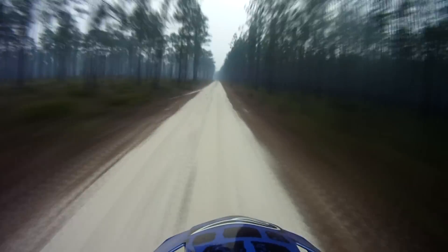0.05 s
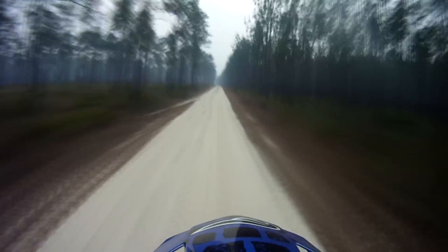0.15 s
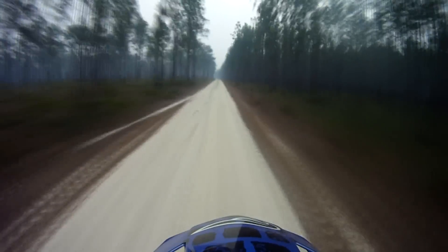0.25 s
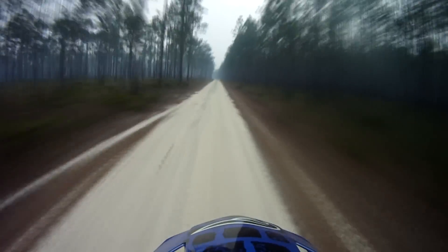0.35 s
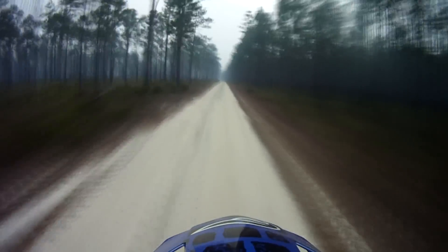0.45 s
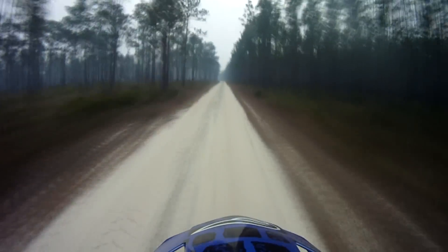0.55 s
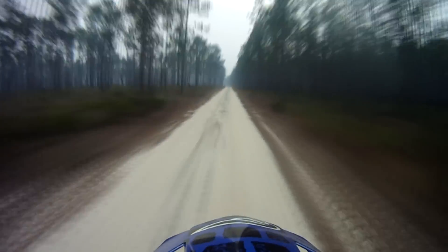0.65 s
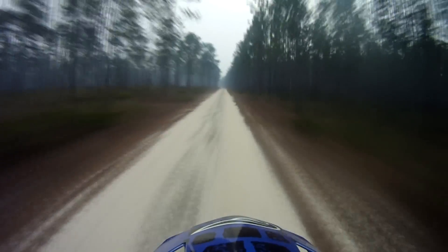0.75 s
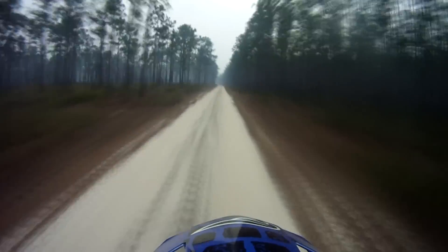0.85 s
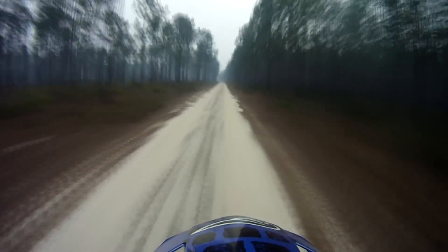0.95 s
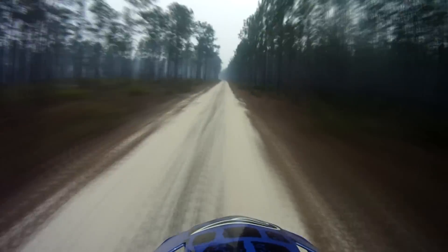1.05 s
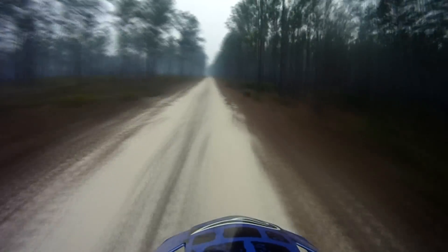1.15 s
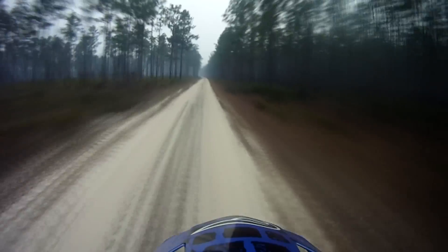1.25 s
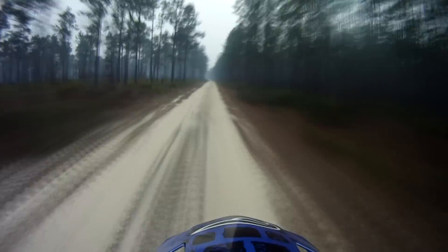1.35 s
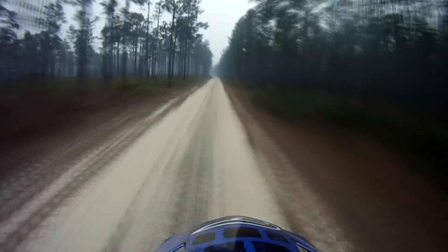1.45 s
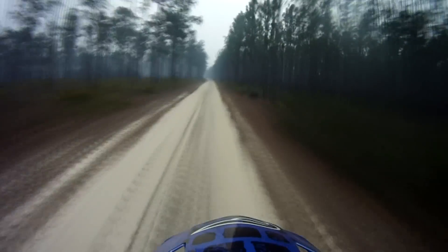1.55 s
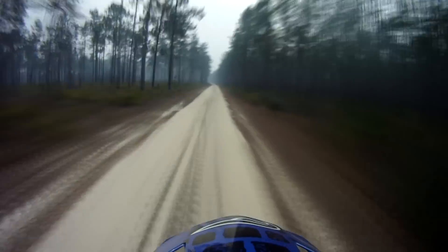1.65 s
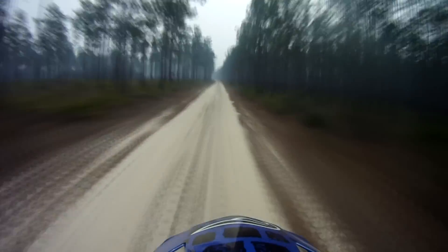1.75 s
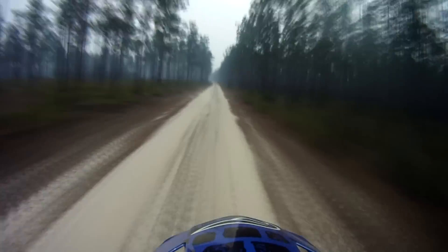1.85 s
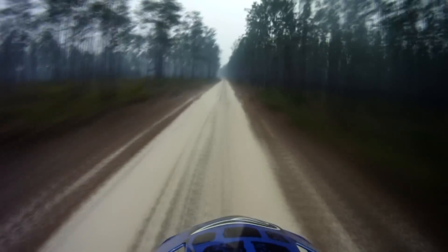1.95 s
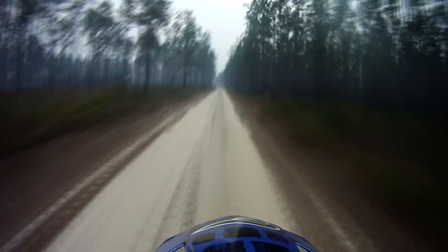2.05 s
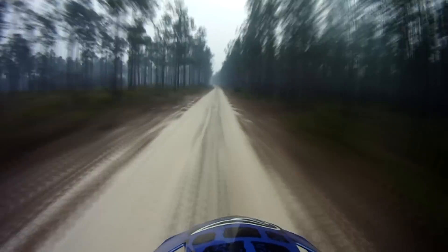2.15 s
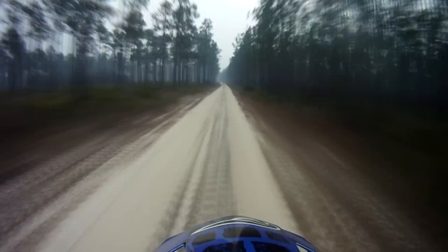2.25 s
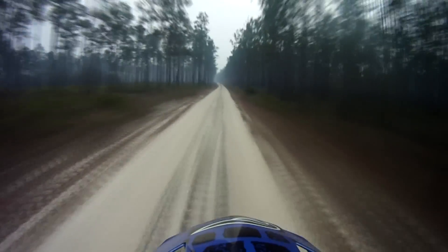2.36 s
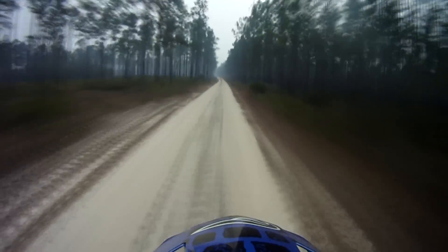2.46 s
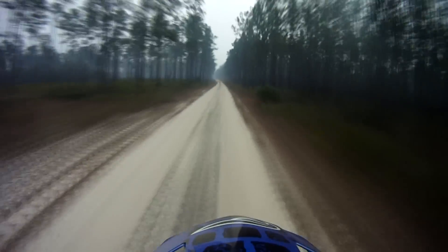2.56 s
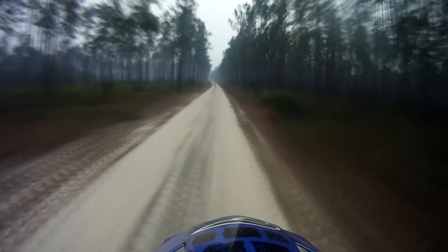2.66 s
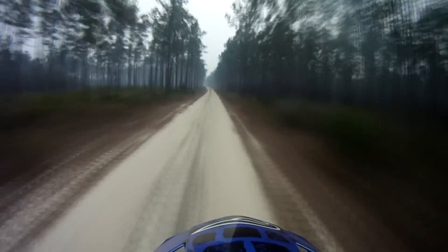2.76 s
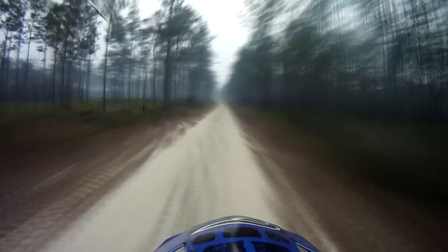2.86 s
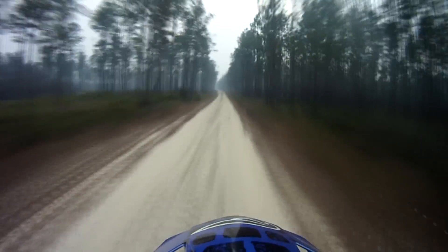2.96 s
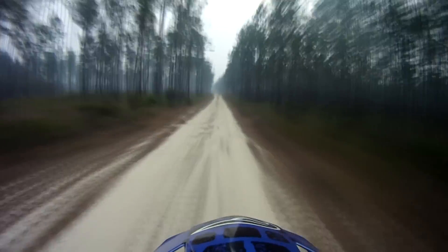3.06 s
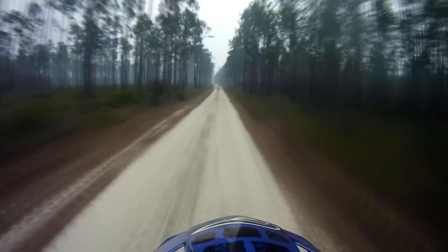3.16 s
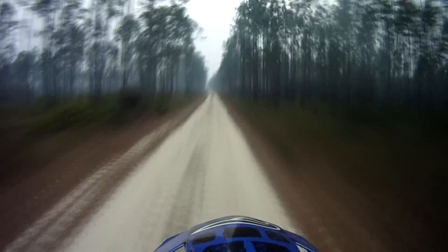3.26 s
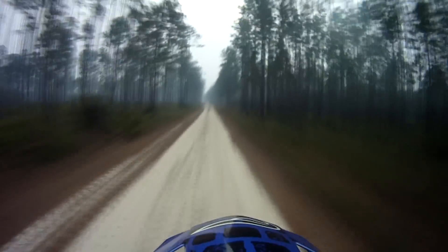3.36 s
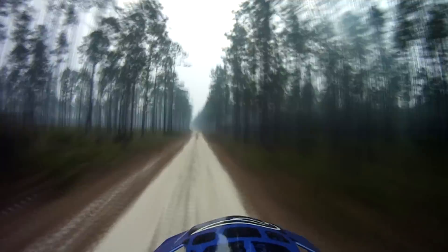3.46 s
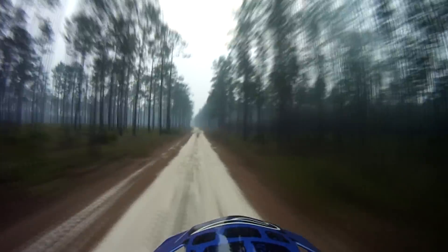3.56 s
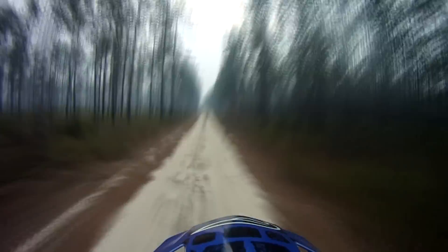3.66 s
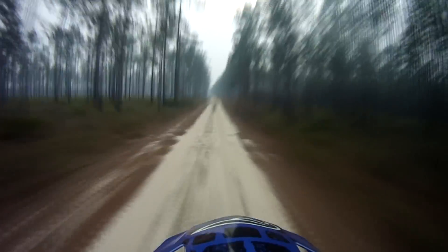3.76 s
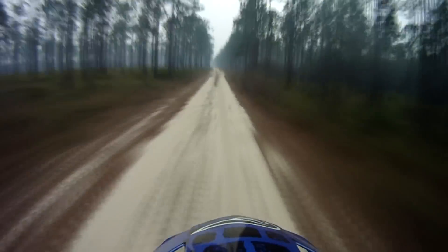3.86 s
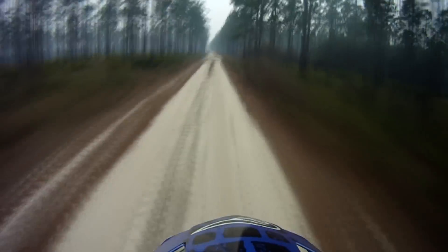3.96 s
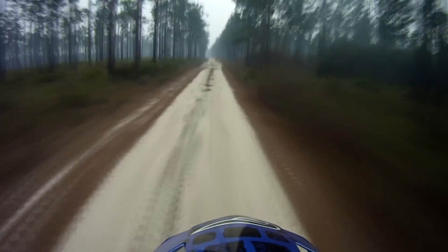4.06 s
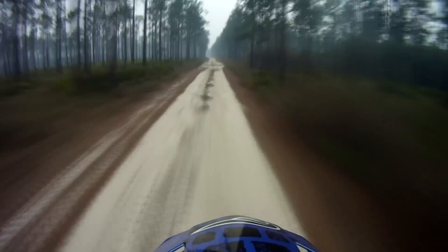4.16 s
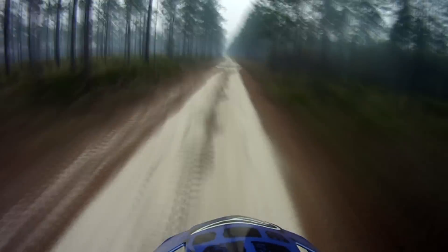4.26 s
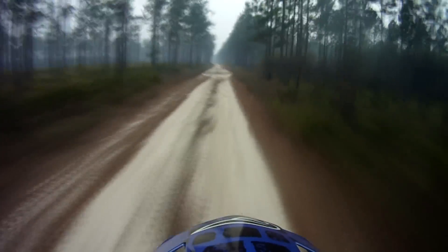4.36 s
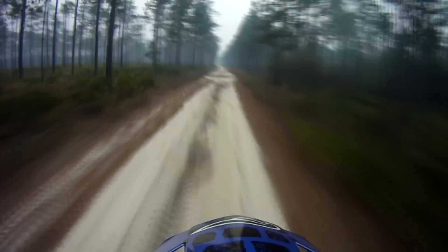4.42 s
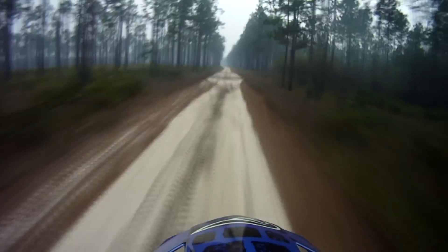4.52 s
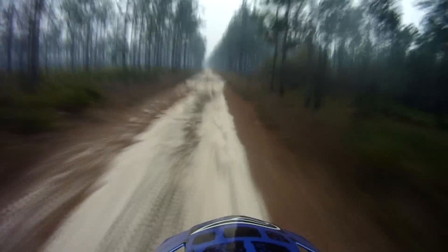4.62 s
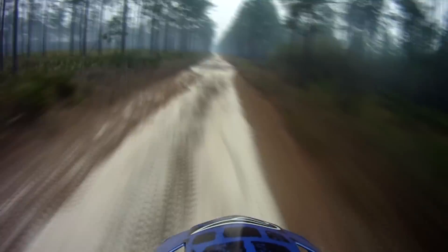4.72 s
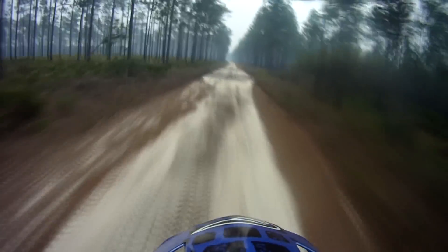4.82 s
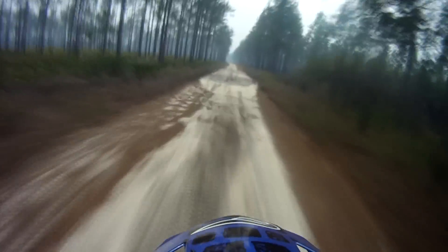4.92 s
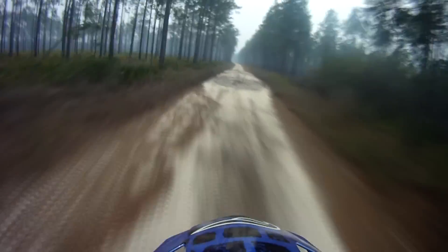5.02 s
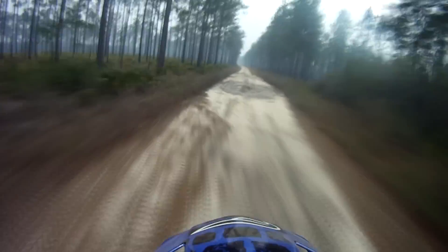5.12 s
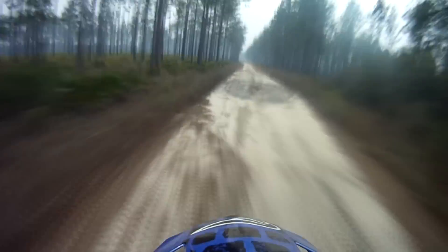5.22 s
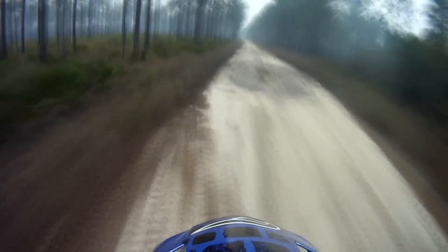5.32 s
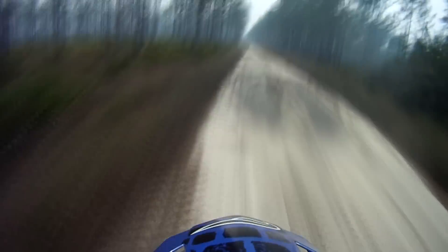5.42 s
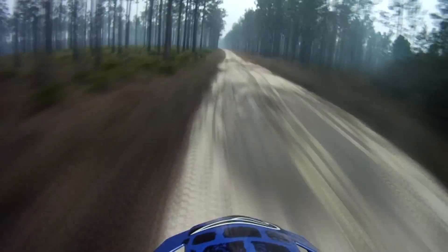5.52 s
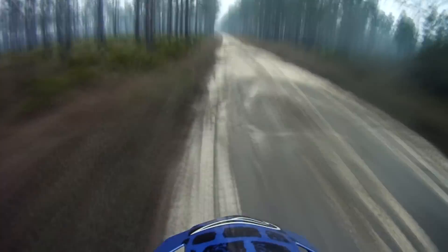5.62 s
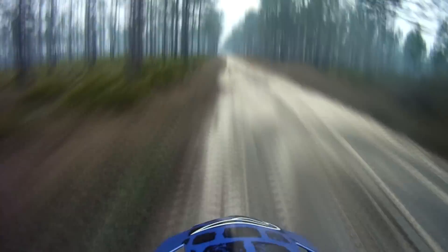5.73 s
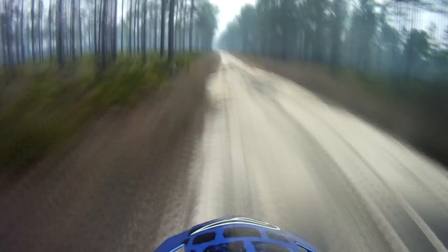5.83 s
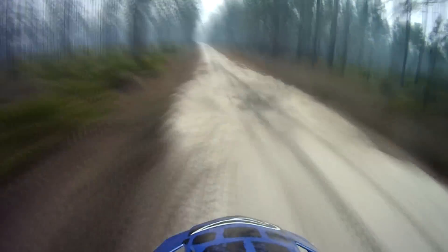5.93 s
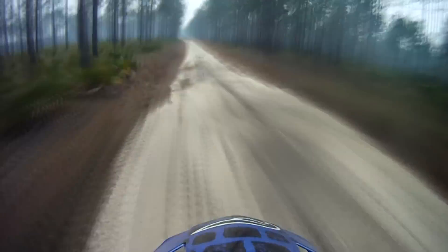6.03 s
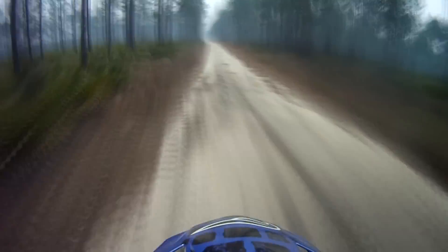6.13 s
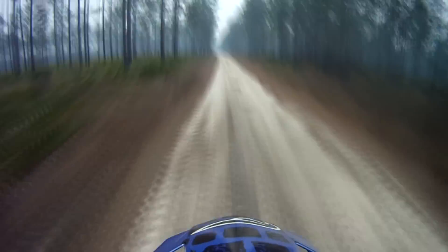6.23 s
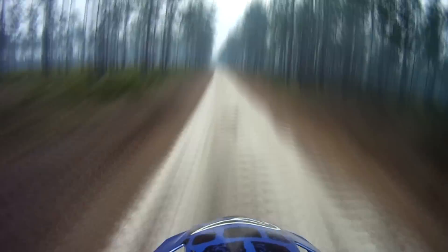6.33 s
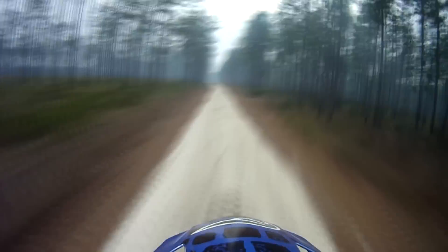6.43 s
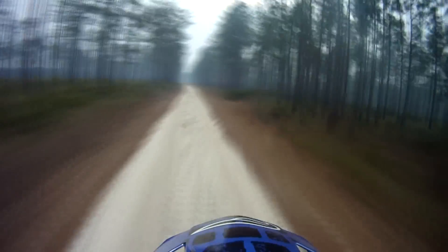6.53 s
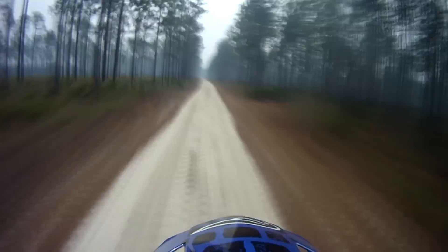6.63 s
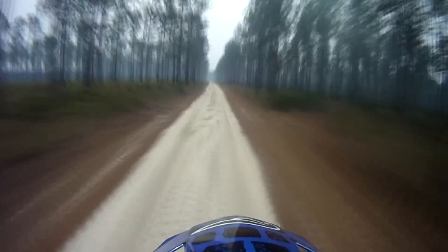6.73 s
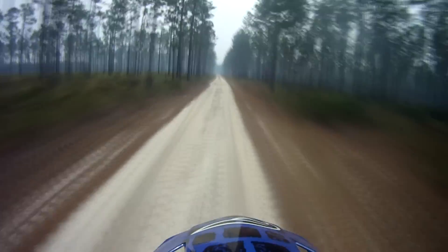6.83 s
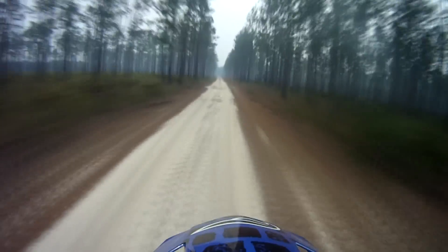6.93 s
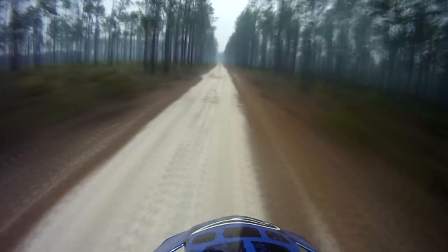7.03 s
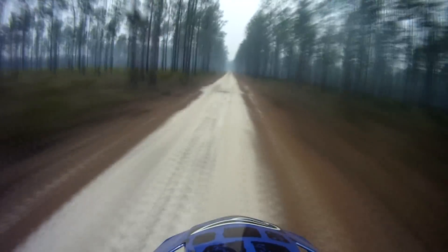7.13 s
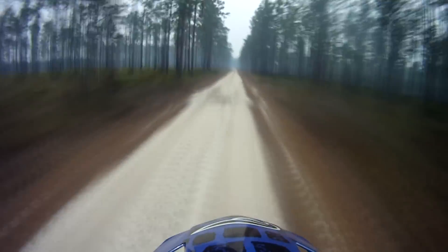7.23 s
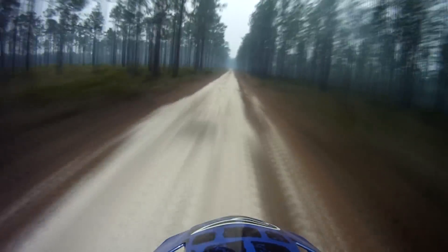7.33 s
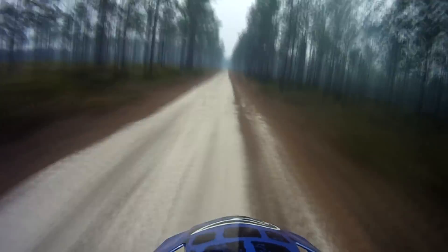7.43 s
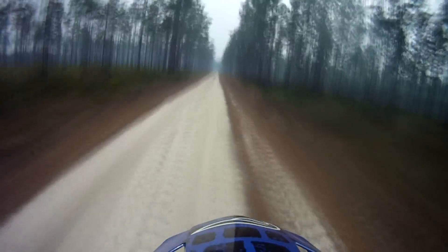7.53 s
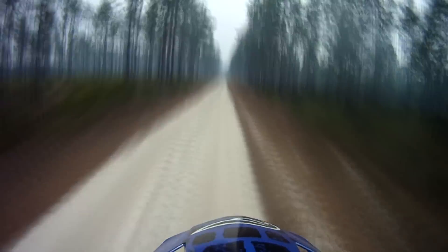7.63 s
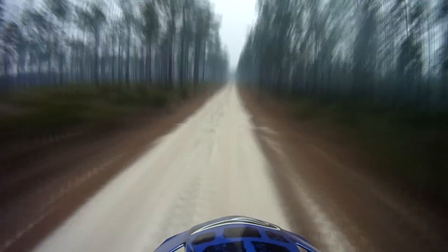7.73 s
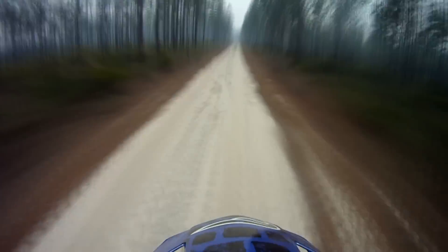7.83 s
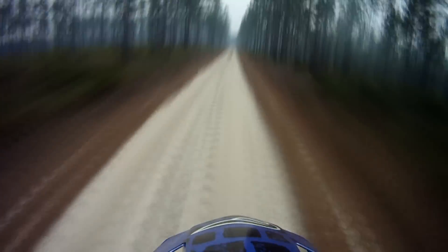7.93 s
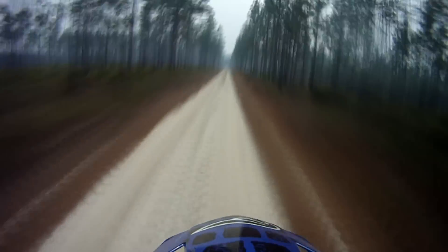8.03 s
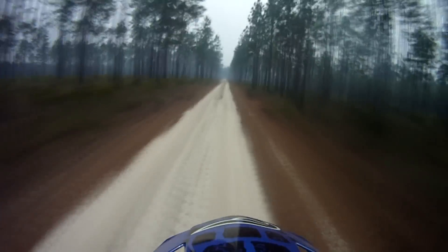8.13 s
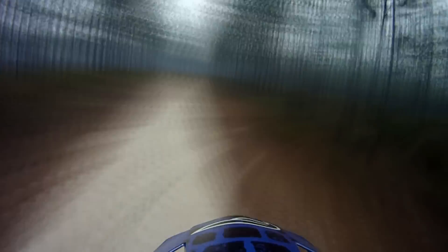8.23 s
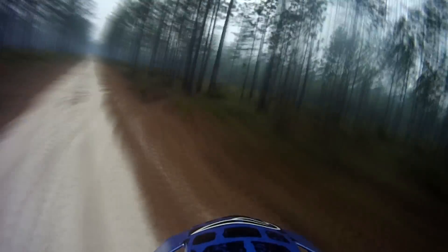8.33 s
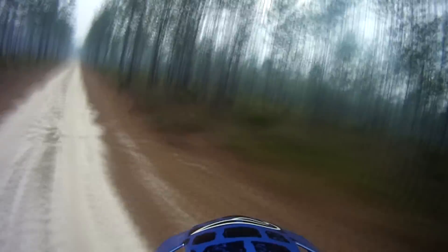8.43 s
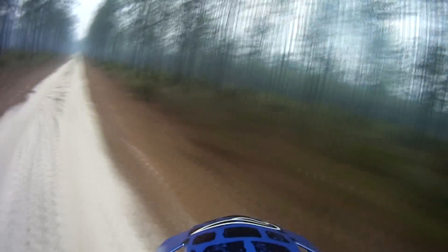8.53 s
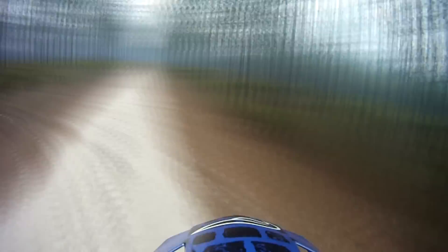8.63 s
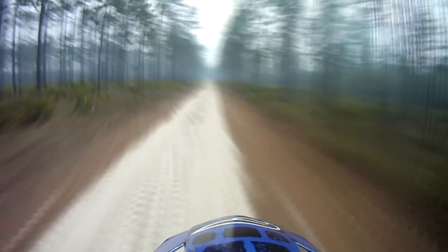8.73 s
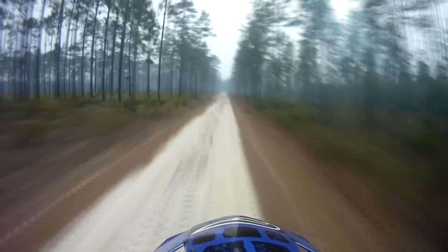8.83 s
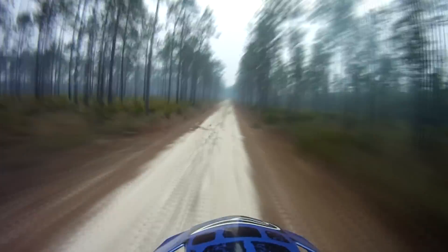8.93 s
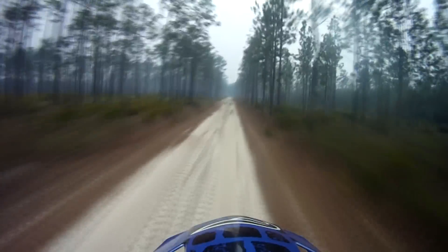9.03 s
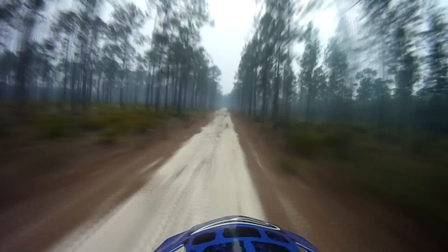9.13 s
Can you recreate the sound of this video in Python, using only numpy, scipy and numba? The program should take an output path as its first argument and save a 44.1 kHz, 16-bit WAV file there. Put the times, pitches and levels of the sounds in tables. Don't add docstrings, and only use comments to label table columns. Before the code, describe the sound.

A helmet microphone rides in the airflow of a motorcycle on a sandy forest road. Ringing wind roar and low booming buffets bury the engine. Around five seconds the wind falls away sharply, the engine shifts down and pulls with a clear rising drone, faint whistles and a hard knock follow, then wind swells over everything again and eases at the end.

```python
import sys
import numpy as np
from scipy import signal
from scipy.fft import rfft, irfft, next_fast_len
from scipy.io import wavfile
from scipy.ndimage import uniform_filter1d
from numba import njit

SR = 44100
rng = np.random.default_rng(int(sys.argv[2]) if len(sys.argv) > 2 else 0)


def put_to_file(sound):
    columns = np.atleast_2d(sound).T
    safe = np.clip(columns, -1, 1)
    whole_steps = np.round(safe * 32767)
    wavfile.write(sys.argv[1], SR, whole_steps.astype(np.int16))


def attenuation_scalar(level_db):
    decades = np.asarray(level_db, float) / 20
    return 10 ** decades


N = 404838

CAMERA_SR = 12000
M = N * CAMERA_SR // SR + 64
T = np.arange(M) / CAMERA_SR
FULL_DB = -26.5


def unit(x):
    return x / np.sqrt(np.mean(x ** 2))


def curves(table):
    s, *columns = np.transpose(table)
    return [np.interp(T, s, column) for column in columns]


def humps(table):
    return sum(db * np.exp(-(2 * (T - s) / length) ** 2) for s, db, length in table)


def walk(rate):
    hold = int(CAMERA_SR / rate)
    steps = np.repeat(rng.standard_normal(600), hold)[:M]
    slewed = uniform_filter1d(np.resize(steps, M), hold)
    return unit(uniform_filter1d(slewed, hold))


@njit
def band(x, hz, width, rate):
    y, b, low = np.empty(len(x)), 0., 0.
    for i in range(len(x)):
        g = np.tan(np.pi * hz[i] / rate)
        k = width / hz[i]
        v = (b + g * (x[i] - low)) / (1 + g * (g + k))
        b = 2 * v - b
        low = low + 2 * g * v
        y[i] = k * v
    return y


def ring(hz, width_hz, count=2):
    x = rng.standard_normal(M)
    for _ in range(count):
        x = band(x, hz * np.ones(M), 1. * width_hz, 1. * CAMERA_SR)
    return unit(x)


def steady(x, share):
    envelope = np.abs(signal.hilbert(x, next_fast_len(M))[:M])
    return unit(x / (envelope + 0.37) ** np.clip(share, 0, 1))


def lull():
    # t/s, level/dB
    wind = [(0.0, -26), (1.41, -28), (1.79, -26), (3.07, -27.5), (3.48, -31.5), (3.58, -28), (3.81, -33.5),
            (4.88, -53.5), (5.83, -41.5), (5.98, -36.5), (6.11, -37.5), (6.67, -30.5), (7.47, -29),
            (7.75, -26.5), (7.98, -29), (8.28, -28.5), (8.51, -31.5), (9.18, -36)]
    # t/s, lift/dB, length/s
    gusts = [
        (.4, 1, 0.37),
        (3.6, -1, .1),
        (5.85, -0.5, .1),
        (2.81, -2.5, 0.075),
        (4.3, 0.5, .12),
        (4.5, 1, 0.16),
        (5.5, -1, 0.32),
        (6.3, 0, 0.051),
        (6.4, -2.5, .1),
        (7.45, -1.5, 0.25),
    ]
    return FULL_DB - curves(wind)[0] - humps(gusts)


def gearbox():
    # t/s, drone f/Hz, climb/(Hz/s), effort/dB, roughness/0-1
    gears = [
        (0, 242, 2.5, -3, .75),
        (3.7, 243.5, -12, 0, 0.79),
        (4.6, 234, -120, 0, 0.91),
        (5.04, 180, 105, 7, .1),
        (5.68, 190, 40, 6, .12),
        (6.49, 184, 80, 2, .25),
        (7, 215.2, 35, -2.5, 0.49),
        (8.25, 238, -19.5, -2, .7),
        (8.7, 225, 0, -5, 0.81),
    ]
    shift_s, smear_s, bite_s, smeared = .05, .45, .4, .8
    columns = np.transpose(gears)
    stage = np.searchsorted(columns[0], T, "right").clip(1) - 1
    start, hz, climb, effort, clean = columns[:, stage]
    since = T - start
    rough = smeared + (clean - smeared) * np.exp(-(since / smear_s) ** 2)
    effort = effort * np.exp(-(since / bite_s) ** 2)
    slide = int(shift_s * CAMERA_SR)
    hz, effort, rough = (uniform_filter1d(c, slide) for c in (hz + climb * since, effort, rough))
    db = -43.5 - 0.6 * lull() + effort + 1.1 * rough * walk(11)
    hunting = 1 + .04 * rough ** 2 * walk(7)
    return hz * hunting, db, np.clip(rough, 0, 1)


def engine():
    hz, db, rough = gearbox()
    turn = 2 * np.pi * np.cumsum(hz * (1 + .012 * walk(20))) / CAMERA_SR
    cycles = np.sin(turn) + attenuation_scalar(-19) * np.sin(2 * turn)
    drone = np.sqrt(2) * attenuation_scalar(1.8 * walk(20)) * cycles
    roar = unit(ring(.5 * hz + 105, 94) + attenuation_scalar(-3.0) * ring(272.0, 32.5))
    thrum = attenuation_scalar(-10.5 + 0.19 * lull()) * ring(136, 72)
    return attenuation_scalar(db - 2.5) * (np.sqrt(1 - rough) * drone + np.sqrt(rough) * roar + thrum)


def jolts():
    # t/s, peak/dB, f/Hz, length/s
    blows = [
        (5.7, -36, 42, .016),
        (8.49, -34, 30, .06),
        (8.54, -34, 110, .08),
        (6.1775, -15, 65, .0175),
    ]
    lead = 1.05
    return sum(attenuation_scalar(db) * np.exp(-(2 * (T - s) / length) ** 2 / 2) * np.cos(2 * np.pi * hz * (T - s) + lead)
               for s, db, hz, length in blows)


def whistles():
    # t/s, length/s, f/Hz, level/dB
    edge_tones = [(1.719, 0.021, 982, -29.5), (2.3, 0.1, 1132, -36), (4.017, .08, 1140, -51),
                  (4.47, 0.16, 1010, -55), (4.96, 0.095, 1263, -57.5), (5.4, 0.53, 703, -68),
                  (4.77, 0.055, 1137, -51.5), (5.29, 0.094, 1140, -51.5), (5.96, .1, 1130, -40),
                  (5.925, .08, 2235, -40), (6, .06, 2240, -38), (6.075, .08, 2405, -43.5),
                  (6.32, .085, 1150, -37), (6.163, 0.03, 1140, -41), (6.247, 0.046, 1150, -46),
                  (6.473, 0.025, 1177, -40), (8.329, 0.035, 998, -37)]
    lower_db = -47 - .62 * lull()
    upper_db = -50.5 - 0.5 * lull()
    tones = np.zeros(M)
    drift = np.cumsum(1 + .004 * walk(25)) / CAMERA_SR
    for s, length, hz, db in edge_tones:
        swell = np.exp(-(2 * (T - s) / length) ** 4)
        tones = tones + attenuation_scalar(db) * swell * np.sin(2 * np.pi * hz * drift)
    flutter = attenuation_scalar(2.5 * walk(60))
    wander_hz = 1145 * (1 + .02 * walk(6))
    singing = attenuation_scalar(lower_db + 1.9 * walk(9)) * ring(wander_hz, 100) + attenuation_scalar(upper_db) * ring(2240, 110)
    return np.sqrt(2) * tones * flutter + singing


def buffet():
    # t/s, shake/dB
    road = [
        (0, 1),
        (3.4, 0.5),
        (5.05, -1.5),
        (5.4, 3),
        (6.3, 2),
        (6.75, 3.5),
        (7.5, 1.5),
        (8.5, 2.5),
        (8.8, 0),
        (9.18, 1),
    ]
    # t/s, peak level/dB
    eddies = [(0.066, -34), (0.669, -34), (0.882, -29), (1.642, -26), (1.954, -33), (2.079, -26),
              (2.214, -37), (2.564, -24.5), (2.719, -32), (3.099, -37), (3.49, -26), (4.019, -40),
              (4.372, -41), (5.683, -36), (5.899, -40), (6.624, -35), (6.759, -39), (7.079, -32),
              (7.514, -30), (7.619, -36), (7.76, -27), (8.082, -27), (8.349, -31), (8.616, -33),
              (9.098, -32)]
    # t/s, lift/dB, length/s
    surges = [(.55, 10, .12), (1.37, 12, .08), (2.6, 10, .06), (2.82, 8, .12), (3.48, 9, .1), (3.82, 9, .1),
              (5.16, 7, .08), (6.46, 11, 0.089), (6.847, 7, .12), (7.41, 8, .12), (7.577, 8, 0.059),
              (8.499, 14.5, 0.086)]
    rise_s, fall_s, eddy_db = 0.018, 0.13, -11
    drop, (shake,) = lull(), curves(road)
    swell = 0
    for s, db in eddies:
        peak_s = s + rise_s
        pace = np.where(T < peak_s, 1 / rise_s, 1 / fall_s)
        swell = swell + attenuation_scalar(db + eddy_db) * np.exp(-(pace * (T - peak_s)) ** 2)
    boom_db = -40 - 0.66 * drop + shake + 1.76 * walk(16)
    press_db = -49 - 0.03 * drop + 1.8 * shake + 2.7 * walk(11) + humps(surges)
    boom = steady(ring(66.3, 10.1, count=1), share=0.3)
    press = steady(ring(19.8, 38), share=0.8)
    return np.hypot(attenuation_scalar(boom_db), swell) * boom + attenuation_scalar(press_db) * press


def rush(gust_db=1.17, flicker_db=-0.07):
    # f/Hz, density/(dB per Hz)
    colour = [(59, -32), (100, -22), (167, -14.5), (232, -6), (326, -18.5), (615, -14), (1120, -4.5),
              (1720, -4), (2070, -1), (3710, -17.5), (4480, -23.5), (5230, -19.5), (6000, -32.5),
              (7800, -63), (13200, -120)]
    # f/Hz, width/Hz, lift/dB
    housing = [(631, 28, -14), (550, 40, 2), (1000, 240, 4), (1055, 50, -5.5), (1140, 32, 3.5),
               (1586, 89, 4), (1712, 130, -4.5), (2100, 240, 2), (2230, 74, 2), (3150, 110, 1),
               (3657, 156, 7), (3760, 90, 0.5), (4090, 210, 4), (4580, 250, -3.5), (5280, 580, 3),
               (5710, 90, -5.5), (5710, 115, 6)]
    # t/s, lift/dB, length/s
    turns = [
        (0, -1, .3),
        (2.05, 1.5, .6),
        (3, 1, 0.36),
        (7.3, -1, 0.29),
        (7.85, -3.5, 0.66),
        (8.6, -3.5, 0.51),
    ]
    size = next_fast_len(M)
    hz = np.maximum(np.fft.rfftfreq(size, 1 / CAMERA_SR), 1)
    colour_hz, colour_db = np.transpose(colour)
    db = np.interp(np.log(hz), np.log(colour_hz), colour_db)
    db = db + sum(lift / (1 + (2 * (hz - f) / w) ** 2) for f, w, lift in housing)
    core = (hz > 700) & (hz < 3000)
    gain = attenuation_scalar(db) * np.sqrt(size / 2 / np.sum(attenuation_scalar(db[core]) ** 2))
    noise = rfft(rng.standard_normal(size)) * gain
    drop = lull()
    level_db = FULL_DB - drop
    low_db = 0.2327 * drop + 1.2 * walk(5)
    mid_db = -0.2059 * drop + .5 * walk(2.9) + humps(turns)
    high_db = -0.205 * drop + 0.56 * walk(5.64)
    out, gust = 0, gust_db * walk(9)
    place = np.clip(2 * np.log2(hz / 141), -1, 11)
    for step in np.arange(-1, 12):
        part = irfft(noise * np.clip(1 - abs(place - step), 0, 1), size)[:M]
        low_share = np.interp(step, [4, 5.5], [1, 0])
        high_share = np.interp(step, [8, 9.5], [0, 1])
        tilt_db = low_share * low_db + high_share * high_db + (step == 7) * mid_db
        out = out + part * attenuation_scalar(level_db + tilt_db + gust + flicker_db * walk(14))
    return out


def held(x):
    hold, splice_s, fade_s = 4, .12, .012
    steps, ticks = np.repeat(x, hold), hold * CAMERA_SR
    chance = rng.random((400, 2))
    slip = (hold * chance[:, 0]).astype(int)
    length = (ticks * splice_s * (.5 + chance[:, 1])).astype(int)
    slips = np.repeat(slip, length)[:len(steps)]
    fade = int(ticks * fade_s)
    out = 0
    for k in range(hold):
        share = uniform_filter1d(uniform_filter1d(1. * (slips == k), fade), fade)
        out = out + share * np.roll(steps, k)
    return out


def scene():
    others = [engine(), whistles(), jolts() + buffet()]
    ticks = sum(held(rush() / np.sqrt(len(others)) + other) for other in others)
    mono = signal.resample_poly(ticks, 147, 160)[:N]
    return np.array([mono, mono])


def top_cut(x):
    return signal.sosfilt(signal.butter(12, 15330, fs=SR, output="sos"), x)


def record(dry):
    slow = uniform_filter1d(np.abs(uniform_filter1d(dry[0], 800)), 1500)
    patches = np.repeat(rng.random(N // 1024 + 1) < .05, 1024)[:N]
    side = attenuation_scalar(-86) + attenuation_scalar(-10.5) * slow + attenuation_scalar(-26.5) * patches * np.roll(dry[0], 3000)
    low_pass = signal.ellip(8, .1, 60, 15330, fs=SR, output="sos")
    smooth = signal.sosfiltfilt(low_pass, dry)
    mix = smooth + attenuation_scalar(-60) + np.array([side, -side])
    return top_cut(mix)


dry = scene()
out = record(dry)
put_to_file(out)
```